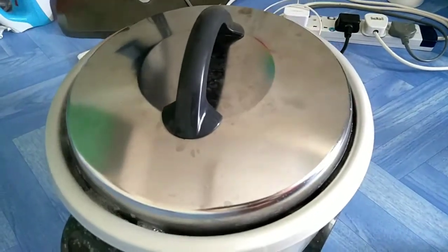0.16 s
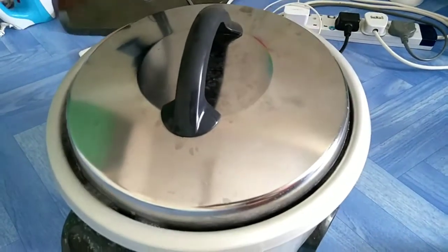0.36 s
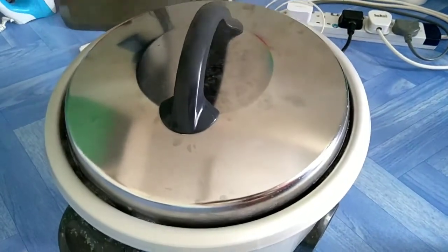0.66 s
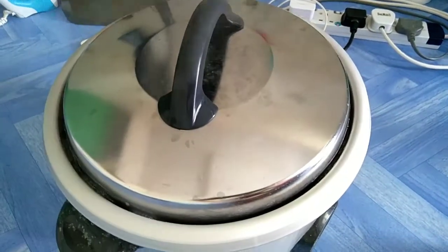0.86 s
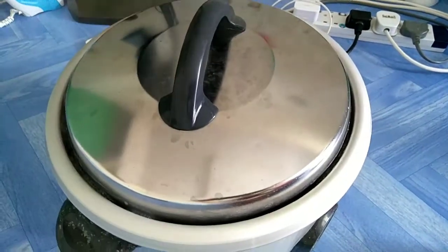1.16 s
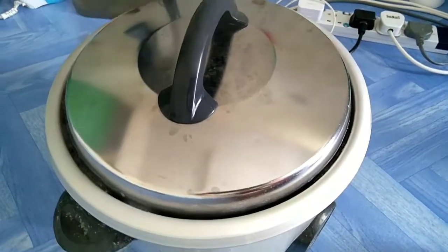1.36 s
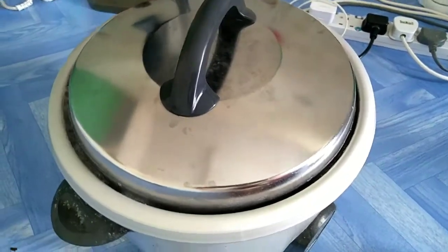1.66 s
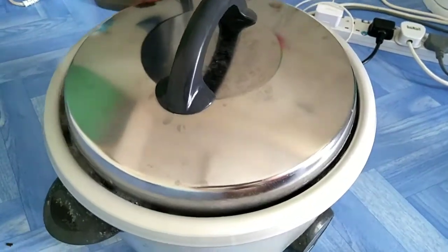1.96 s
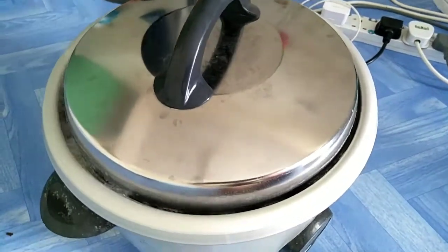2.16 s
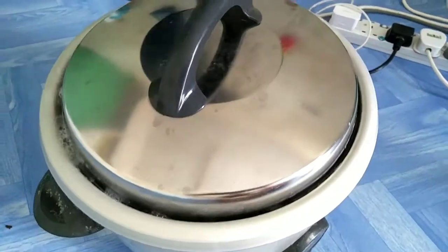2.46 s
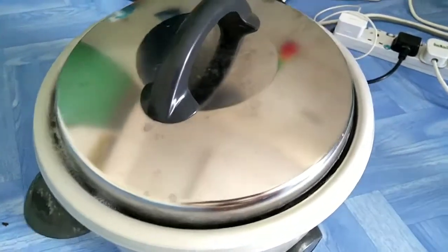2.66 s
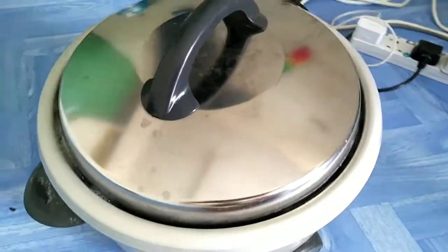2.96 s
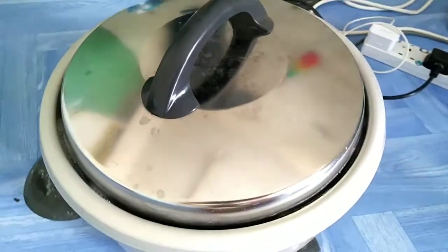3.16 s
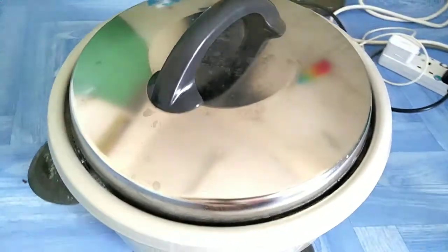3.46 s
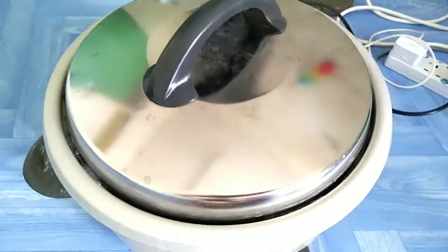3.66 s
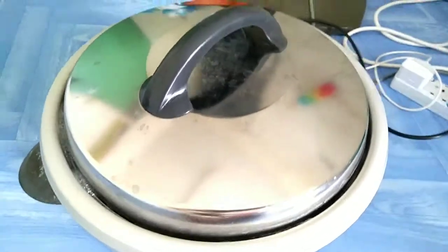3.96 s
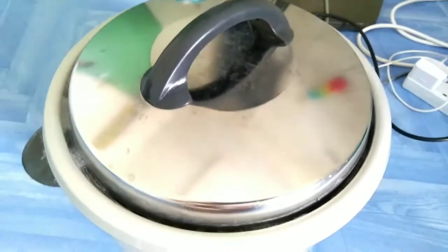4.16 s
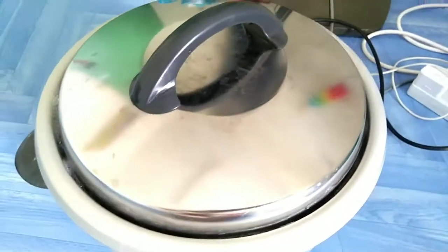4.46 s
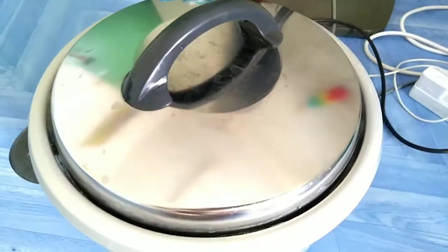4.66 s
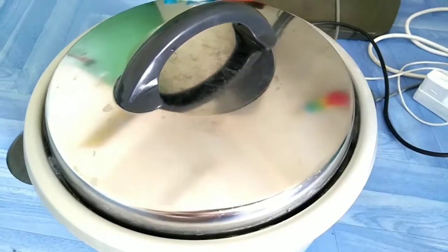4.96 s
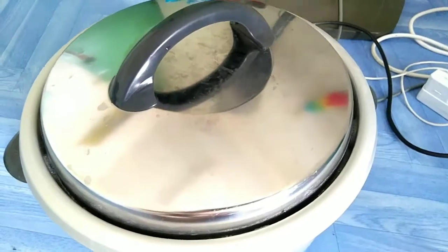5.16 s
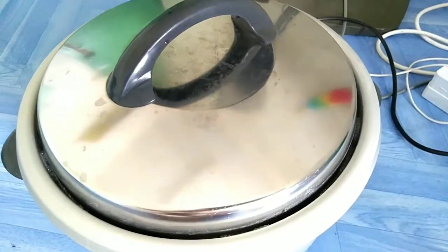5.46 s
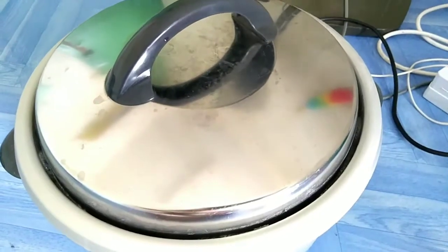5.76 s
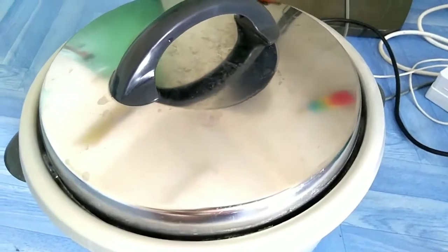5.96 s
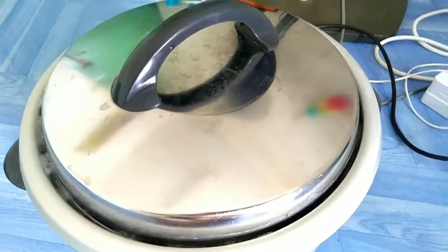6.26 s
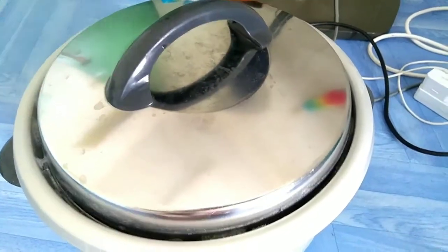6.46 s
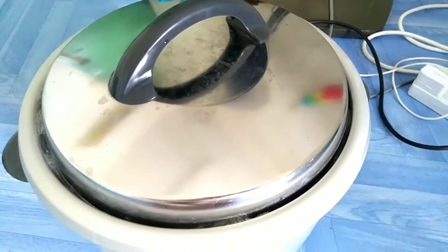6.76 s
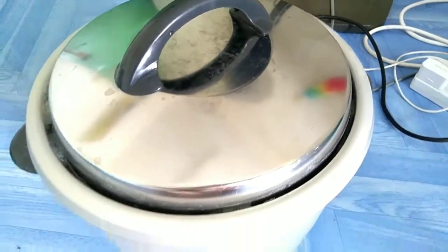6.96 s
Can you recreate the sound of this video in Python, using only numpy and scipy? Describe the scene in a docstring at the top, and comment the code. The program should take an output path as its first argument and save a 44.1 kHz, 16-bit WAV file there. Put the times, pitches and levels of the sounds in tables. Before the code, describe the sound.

Heard very close in a small kitchen, an electric rice cooker boils under a closed steel lid. Irregular hollow ticks and knocks ride over gurgling, deep rumble and a low hum. The lid clanks at once, then harder soon after two seconds, near four and six seconds, each time with a short wet hiss of steam. Knocking grows denser towards the end.

```python
"""A rice cooker boils under its closed steel lid, heard from just above it in a small kitchen.
At once the lid drops with a clank and a spit of steam; then bursting bubbles tick against it.
It drops again soon after 2 s, as the sound starts to shift from the pot's front to its side, then near 4.2 and 6.3 s.
All along, damped tones make bubbles and foam, shaped noise makes rumble, steam and air, and wavering sines hum."""
import sys
import numpy as np
from scipy import signal
from scipy.fft import rfft, irfft
from scipy.io import wavfile
from scipy.ndimage import uniform_filter1d

SR = 44100
rng = np.random.default_rng(int(sys.argv[2]) if len(sys.argv) > 2 else 0)


def transcribe(signal):
    """Save signal, clipped to [-1, 1], as a 16-bit WAV file at the path in sys.argv[1]."""
    frames = np.atleast_2d(signal).T
    limited = np.clip(frames, -1, 1)
    pcm = np.round(limited * 32767).astype(np.int16)
    wavfile.write(sys.argv[1], SR, pcm)


N = 313992
TAIL = 23000  # samples in an echo or a ringing tail

# bursting bubbles knock on the lid:
# (t/s, strength/dB, hardness 0-1 from a wet nudge to bare steel, dome pitch f/Hz, spit pitch f/Hz)
KNOCKS = [(0.035, -33.5, 0.8, 1750, 6300), (0.0669, -30, 0.35, 1790, 6400), (0.091, -55, 0.4, 1750, 6300),
          (0.261, -42.5, 0.3, 1780, 6200), (0.537, -27, 0.54, 1748, 7060), (0.5671, -27.5, 0, 1750, 7200),
          (0.762, -40, 0, 1704, 6000), (1.1055, -27, 0.2, 1738, 7150), (1.185, -32, 0.3, 1760, 6100),
          (1.55, -48, 0.3, 1726, 6000), (1.5923, -42, 0.6, 1725, 6050), (1.7399, -36.5, 0.2, 1760, 6400),
          (1.9194, -28, 0.68, 1751, 6360), (2.039, -25, 0.67, 1772, 7100), (2.199, -30.5, 0.3, 1696, 7200),
          (2.22, -26.5, 0.6, 1750, 7200), (2.271, -27, 0, 1733, 6600), (2.49, -28.5, 0.8, 1780, 5900),
          (2.6622, -29, 0.5, 1776, 6200), (2.709, -31, 0.2, 1776, 6100), (2.765, -33.5, 0, 1800, 6600),
          (2.801, -41, 0.1, 1810, 5900), (2.843, -43, 0, 1834, 6000), (2.9809, -26, 0.79, 1753, 6260),
          (3.072, -35.5, 0.4, 1770, 5570), (3.168, -34.5, 0.2, 1733, 5700), (3.33, -33, 0.24, 1740, 6240),
          (3.6072, -31.5, 0.73, 1712, 7240), (3.695, -31, 0.69, 1725, 6600),
          (3.741, -35.5, 0.54, 1760, 6100), (3.8183, -29, 0.82, 1755, 6700), (4.027, -34.5, 0, 1744, 7100),
          (4.057, -29.5, 0.66, 1730, 7200), (4.1094, -26, 0.83, 1734, 6950),
          (4.545, -39.5, 0.45, 1730, 5900), (4.606, -44, 0.84, 1730, 5900),
          (4.752, -26.5, 0.86, 1700, 5900), (4.8188, -26, 1, 1707, 6450), (4.854, -37, 0.94, 1730, 6400),
          (4.905, -41, 0.8, 1790, 6000), (5.0039, -28.5, 0.61, 1774, 7460),
          (5.0854, -29.5, 0.62, 1735, 5840), (5.1617, -34.5, 0, 1750, 6200),
          (5.292, -41.5, 0.2, 1750, 5800), (5.36, -34.5, 0, 1750, 5670), (5.6253, -29, 0.38, 1747, 6450),
          (5.7924, -24.5, 0.76, 1718, 7560), (6.025, -24, 0.5, 1717, 7500), (6.0908, -27, 0.3, 1720, 7300),
          (6.1463, -31, 0.75, 1776, 7100), (6.389, -19.5, 0.5, 1793, 6100), (6.408, -29, 0.3, 1810, 6200),
          (6.4355, -25.5, 0.8, 1776, 6100), (6.4791, -28.5, 0.1, 1870, 6000), (6.774, -27, 0.9, 1860, 6950),
          (6.8232, -25, 0.7, 1785, 7400), (6.8657, -27, 0.7, 1827, 6800), (6.959, -27, 0.7, 1834, 6700),
          (7.058, -30, 0.66, 1812, 7400)]
# the lifted lid drops back on its seat: (t/s, strength/dB, echo tail/dB, clank level/dB, clank t60/s,
# flange ring level/dB, flange pitch f/Hz, dome pitch f/Hz, extra long lid tones/dB)
DROPS = [(.0034, -23.5, 7, -49.5, 0.067, -68, 4700, 1755, -18),
         (2.3100, -12, 3, -53, 0.53, -50.5, 3500, 1796, 5),
         (2.461, -20.5, 9, -80, 0.46, -65, 4500, 1762, -1),
         (4.182, -9.5, 3.5, -44.5, 0.44, -51.5, 3000, 1803, 2),
         (6.3028, -17.5, 5.5, -54, 0.36, -73, 3200, 1777, -10),
         (6.3651, -6, -3, -36.5, 0.49, -51, 3400, 1767, -10),
         (6.3755, -11, 0.5, -40, 0.62, -55, 4600, 1790, -4)]
DROP_HARDNESS, DROP_SPIT_HZ = 0.61, 6240

# tone colours of a knock's ring, hollow body and spit, each: (f/Hz, relative level/dB)
RING_COLOUR = [(800, -36.5), (1080, -30.5), (1250, -8), (1380, -11), (1500, -7), (1630, -11), (1730, 1),
               (1840, -6.5), (1930, -19.5), (2060, -28.5), (2300, -60), (3000, -71)]
BODY_COLOUR = [(25, -28.5), (50, -14.5), (120, 1.5), (200, 5), (320, -6.5), (480, -1.5), (650, 0),
               (820, -0.5), (1100, -5.5), (1600, -38), (2000, -43), (2600, -45.5), (4500, -71)]
SPIT_COLOUR = [(3000, -43), (4300, -8), (5000, -7.5), (5600, -1.5), (6400, 2.5), (7400, 5.5), (8300, -0.5),
               (9200, -6), (11500, -8.5), (13500, -28), (14500, -47), (16000, -61)]
# long-ringing tones of the steel lid: (f/Hz, relative level/dB, t60/s)
LID_TONES = [(813, -4, 0.56), (1231, -22, 1.1), (1466, -9.5, 1.0), (1527, 4, 0.72), (1727, -5.5, 0.48),
             (1883, -14.5, 0.19), (1847, -4, 0.8), (2084, -31, 0.8), (2506, -21.5, 0.38), (2823, -28, 0.51),
             (3160, -27, 0.33)]
# short tones of the lid's dome, all shifted with the first by the water on its seat:
# (f/Hz, relative level/dB, t60/s)
DOME_TONES = [(1760, 0, .26), (1810, -7, .3), (1490, -13, .2), (1270, -14, .15), (800, -16, .12),
              (625, -14, .14)]
# high tones of the lid's rim: (f/Hz, relative level/dB, t60/s)
RIM_TONES = [(5610, 0, .36), (6120, -6, .3), (6680, -4, .3), (7080, -2, .3), (7500, 0, .33),
             (7890, -7, .26), (8380, -4, .24)]
# tones of the pot's flange, which only the falling lid reaches: (f/Hz, relative level/dB, t60/s)
FLANGE_TONES = [(2490, -3, .36), (2760, 0, .33), (3200, -8, .3), (3600, -9, .3), (4177, -10, .4),
                (4490, -2, .45), (4750, 0, .33), (5200, 0, .28), (5420, 6, .38), (6293, 5, .3)]
# colour of the clank: (f/Hz, relative level/dB)
CLANK_COLOUR = [(1600, -28), (2200, 21), (2500, 6), (2800, 8.5), (3250, 1.5), (3600, -19), (4100, -7),
                (4600, -13), (5400, -16), (7200, -33), (12000, -53)]
# colour of the instant of steel meeting steel: (f/Hz, relative level/dB)
CRACK_COLOUR = [(3500, -24), (4500, -8), (5000, -5), (5500, -4.5), (6200, 6.5), (7300, 3), (9000, -10),
                (12800, -19), (14000, -27), (16000, -42)]
# stereo width of a drop's spray and crack: (f/Hz, side minus middle level/dB)
WIDTH = [(2500, -45), (4500, -28), (6000, -17), (7500, -3), (9000, 0), (14000, -10)]

# parts of a knock against its strength: level when soft (dB), extra when fully hard (dB)
RING_DB, BODY_DB, BODY_HARD_DB, SPIT_DB, SPIT_HARD_DB = -10, -18, 8.5, -65, 36.5
DOME_DB, DOME_MOST_DB = -10, -25.5  # against strength; the seat stops the dome swinging wider than the second
DOME_TOP_HZ = 1980  # a steep filter keeps the dome's ring below this pitch
RIM_DB, RIM_MOST_DB = 3, -53  # rim tones against the spit; the wet seat damps them above the second
TONES_DB, TONES_SLOPE = -20, 1.45  # long lid tones: level, and dB per dB of strength
TAIL_DB, TAIL_SOFT_DB = 7, -4.5  # echo tail of a hard knock; dB added for a fully soft one
SPIT_FOCUS_DB, RIM_FOCUS_DB, FLANGE_FOCUS_DB = 19, 37, 10  # fall per octave away from a blow's own pitch
SPUTTER_DB, SPUTTER_RATE = 3, 110  # spray breaks up: spread of level, spurts per second
CRACK_DB, CRACK_T60_S = -27.5, .05  # level against the drop's strength, decay
CRACK_TAIL_DB, CRACK_TAIL_T60_S = -11, .33  # the crack's echo in the kitchen
# faint taps: per second, ring and hollow body against the boil (dB), spread of level (dB)
TAP_RATE, TAP_DB, TAP_BODY_DB, TAP_SPREAD_DB = 20, -14, -8, 6

# the lid trembles on its seat: (t/s, length/s, resonance f/Hz, peak level before flutter/dB)
CHATTER = [(.261, 0.12, 1500, -48.5), (.6, 0.13, 1533, -50), (1.11, 0.041, 1775, -43),
           (1.478, 0.15, 1740, -50.5), (1.739, 0.094, 1783, -52), (1.905, 0.056, 1750, -41.5),
           (3.26, 0.1, 1735, -45.5)]
CHATTER_RATE = 130  # contacts per second
CHATTER_RISE_S, CHATTER_T60_S = 0.015, .2

# colour of steam seeping through the wet rim: (f/Hz, relative level/dB)
STEAM_COLOUR = [(2500, -11), (3700, -16), (4500, -24), (5000, -9), (5600, -0.5), (6300, -1), (7200, -2.5),
                (8600, -13), (11500, -27.5), (13500, -35), (16000, -56)]
# puffs of steam: (peak t/s, half length/s, level/dB, share of free jet against wet sputter 0-1)
PUFFS = [(0.553, 0.02, -64.5, 0.84), (1.118, 0.024, -72, .95), (2.42, 0.094, -56, 0.2),
         (2.68, 0.079, -64.5, 0.97), (3.933, 0.065, -66.5, 0.2), (4.28, 0.08, -55.5, 0.06),
         (4.88, 0.1, -69, 0), (6.294, 0.066, -61, 0), (6.47, 0.1, -58, 0), (6.823, 0.045, -78, 0.2),
         (7.003, 0.023, -67, 0.1)]
# colour of a free jet: (f/Hz, relative level/dB)
PUFF_COLOUR = [(4500, -10), (5900, -2), (6700, 10.5), (8200, -3), (10000, 3), (11500, 0), (12600, -18),
               (15000, -28)]
# thin wavering tones, steam whistling at the rim and the flange ringing on after a drop:
# (peak t/s, half length/s, level before wavering/dB, mean pitch f/Hz)
THIN_TONES = [(2.5, .035, -67, 4520), (2.535, .025, -73, 3270), (2.58, .035, -75, 4170),
              (2.69, 0.072, -61.5, 6140), (3.023, 0.092, -73, 5650), (3.933, 0.029, -74, 5260),
              (4.01, 0.031, -74, 5750), (4.66, .05, -76, 5620), (6.276, 0.029, -65, 5470)]
SEEP_DB, SEEP_SLOPE = -86.5, 0.45  # seeping steam in a middling boil; dB per dB of boil
SQUEEZE_DB = -42.5  # steam pressed out by the falling lid, against the drop's strength
SQUEEZE_RISE_S, SQUEEZE_HOLD_S, SQUEEZE_T60_S = 0.0089, 0.068, 0.2
SIZZLE_ECHO_DB, SIZZLE_PATCHY_DB = 6, 8  # droplets ring the gap: early echo level, how far a few pitches stand out
THIN_DRIFT, THIN_JITTER = .006, .012  # slow and quick spread of a thin tone's pitch, as shares of it

# how hard it boils, before the gains below: (t/s, middling bubbles level/dB, small bubbles level/dB)
BOIL = [(0.0, -41, -76.5), (0.28, -57.5, -80), (0.95, -59, -76.5), (1.59, -58.5, -75), (1.94, -49.5, -52),
        (2.05, -38.5, -46), (2.16, -44, -61), (2.42, -47, -49), (2.74, -44.5, -59), (3.39, -62, -64.5),
        (3.61, -63, -66), (3.79, -47.5, -53.5), (4.2, -47, -48.5), (4.54, -50.5, -52), (4.8, -54.5, -68),
        (4.96, -46, -46), (5.19, -78, -58.5), (5.49, -70.5, -53.5), (5.65, -55.5, -52.5),
        (6.05, -50, -54.5), (6.25, -45, -46), (6.41, -43.5, -52), (6.64, -56, -56.5), (7.12, -48.5, -45.5)]
# colours of the deep rumble, the bubbling and the foam, each: (f/Hz, relative level/dB)
RUMBLE_COLOUR = [(20, -13.5), (33, -15), (56, -10.5), (72, -7), (98, -3.5), (120, -5), (145, -9.5),
                 (178, -6), (230, -7.5), (310, -13), (450, -21.5), (700, -34.5), (1500, -57.5)]
BUBBLING_COLOUR = [(250, -7.5), (420, 1.5), (640, 5.5), (760, -2), (900, -3.5), (1080, -12), (1280, -1),
                   (1580, -5.5), (1750, -0.5), (1900, -8.5), (2100, -24.5), (2800, -52)]
FOAM_COLOUR = [(1500, -35), (2000, 6.5), (2250, 2), (2500, -4), (2900, -9), (3600, -33)]
# foam surges up to the rim: (peak t/s, half length/s, level/dB)
SURGES = [(1.83, 0.061, -68), (3.3, 0.09, -62.5), (4.72, 0.57, -63.5), (5.27, 0.26, -62.5), (6, 0.21, -56),
          (6.55, 0.37, -58.5)]
# single damped tones, bubbles ringing out and high pings of the struck rim:
# (t/s, pitch f/Hz, level before swell and flutter/dB, t60/s)
PLINKS = [(.003, 4700, -58.5, 0.18), (.14, 645, -56, 0.38), (.262, 960, -56, 0.14), (.328, 621, -46, 0.42),
          (.33, 740, -47, 0.18), (.342, 1055, -57, 0.14), (.382, 1010, -63, .13), (.412, 644, -51, 0.44),
          (.478, 1590, -61, 0.31), (.54, 5330, -70, 0.18), (.6, 653, -60, 0.33), (.68, 783, -57, 0.4),
          (.682, 480, -50, 0.093), (.762, 1228, -47.5, 0.14), (.888, 1460, -54, 0.19),
          (.888, 598, -45.5, 0.2), (.975, 1490, -55, 0.15), (.995, 404, -48, 0.28), (1.01, 1950, -60, .2),
          (1.365, 1730, -55, 0.14), (1.55, 1354, -54, 0.15), (1.595, 615, -51.5, .3),
          (1.66, 1310, -54, 0.12), (1.71, 785, -53, 0.33), (1.985, 635, -37.5, 0.33),
          (2.19, 77.2, -19, 0.28), (2.32, 432, -27, 0.079), (2.85, 1040, -51, 0.18),
          (3.405, 1744, -44, 0.13), (3.48, 960, -56, 0.37), (3.555, 1740, -56, 0.3)]
GURGLE_DB, SMALL_DB = -4, 1.5  # gain of middling and small bubbles
LUMP_DB, LUMP_RATE = 2.2, 14  # bubbles come in clusters: spread of level, clusters per second
RUMBLE_FRONT_DB, RUMBLE_SIDE_DB = -42, -43  # the steady rumble, heard from the front and from the side

# the hum: (mean f/Hz, mean level from the front/dB, mean level from the side/dB)
HUM = [(57, -53.5, -55), (96.5, -50, -48.5), (117.7, -47, -62.5), (177, -48.5, -56.5)]
# the phone moves round the pot: (t/s, share of the way from front to side 0-1)
PATH = [(0, 0), (2.4, 0), (3.3, 1), (7.12, 1)]
# colour of the steady background hiss: (f/Hz, relative level/dB)
AIR_COLOUR = [(500, 1), (1500, 8.5), (2200, 9.5), (2800, 5), (3700, -2), (4600, -2.5), (5800, 0.5),
              (7500, -7), (10000, -5), (15500, -6.5)]
TOP_HZ = 15650  # the phone's upper limit


def lid_knocks():
    """Bubbles knock on the lid in the middle; its drops add a wide high hiss: middle, side."""
    mid, side = np.zeros((2, N))
    for s, db, hardness, dome_hz, spit_hz in KNOCKS:
        tail_db = TAIL_DB + TAIL_SOFT_DB * (1 - hardness)
        add(mid, s, knock(db, hardness, tail_db, dome_hz, spit_hz))
    for s, db, tail_db, *_, dome_hz, tones_db in DROPS:
        add(mid, s, knock(db, DROP_HARDNESS, tail_db, dome_hz, DROP_SPIT_HZ, tones_db))
        add(side, s, spray(db, DROP_HARDNESS, DROP_SPIT_HZ))
    return mid, side


def knock(db, hardness, tail_db, dome_hz, spit_hz, tones_db=0):
    """One blow rings the lid; the harder it is, the more hollow body and bright spit."""
    ring = echoes(-2.1, 0.07, 1.5 + tail_db, 0.46, width_hz=55, patchy_db=4)
    body = echoes(1.1, 0.029, 0.5 + tail_db, 0.45, width_hz=51.7, patchy_db=3.0)
    dome_modes = np.array(DOME_TONES) * [dome_hz / DOME_TONES[0][0], 1, 1]
    dome = steel(dome_modes, scatter_db=1.5, detune=.004, rise_s=.003, flutter_rate=90)
    rim_modes = focus(RIM_TONES, spit_hz, RIM_FOCUS_DB)
    rim = steel(rim_modes, scatter_db=2.5, detune=.008, rise_s=.012, flutter_rate=90)
    long_tones = steel(LID_TONES, scatter_db=1.5, detune=0.00071, rise_s=0.1)
    spit_db = db + SPIT_DB + SPIT_HARD_DB * hardness
    return (undb(db + RING_DB) * strike(colour(ring, RING_COLOUR))
            + undb(min(db + DOME_DB, DOME_MOST_DB)) * below_top(dome)
            + undb(db + BODY_DB + BODY_HARD_DB * hardness) * strike(colour(body, BODY_COLOUR))
            + undb(TONES_DB + TONES_SLOPE * db + tail_db + tones_db) * long_tones
            + undb(min(RIM_DB + spit_db, RIM_MOST_DB)) * rim
            + spray(db, hardness, spit_hz))


def spray(db, hardness, spit_hz):
    """Water squeezed from the seat builds over a few milliseconds and sputters round one pitch."""
    t = np.arange(TAIL) / SR
    spurts = np.interp(t * SPUTTER_RATE, np.arange(100), rng.standard_normal(100))
    hiss = echoes(8, 0.04, 16, 0.24, width_hz=170, patchy_db=8)
    hiss = hiss * (1 - fade(t, 0.012)) * undb(SPUTTER_DB * spurts)
    hiss = strike(colour(hiss, focus(SPIT_COLOUR, spit_hz, SPIT_FOCUS_DB)))
    return undb(db + SPIT_DB + SPIT_HARD_DB * hardness) * hiss


def below_top(x):
    """A steep filter keeps the dome's ring below its top pitch."""
    return signal.sosfilt(signal.cheby1(10, .5, DOME_TOP_HZ, fs=SR, output="sos"), x)


def lid_drops():
    """Steel on steel: the falling lid cracks down, clanks and rings the pot's flange: middle, side."""
    mid, side = np.zeros((2, N))
    t = np.arange(TAIL) / SR
    burst = fade(t, CRACK_T60_S) + undb(CRACK_TAIL_DB) * fade(t, CRACK_TAIL_T60_S)
    for s, db, _, clank_db, t60, flange_db, flange_hz, *_ in DROPS:
        clank = echoes(3, .1, 26, t60, width_hz=60, patchy_db=11)
        add(mid, s, undb(clank_db) * strike(colour(clank, CLANK_COLOUR)))
        modes = focus(FLANGE_TONES, flange_hz, FLANGE_FOCUS_DB)
        flange = steel(modes, scatter_db=2, detune=.003, rise_s=.04, flutter_rate=55)
        add(mid, s, undb(flange_db) * flange)
        for out in mid, side:  # separate noise for each, so the crack sounds wide
            crack = colour(patchy(width_hz=160, patchy_db=2.5) * burst, CRACK_COLOUR)
            add(out, s, undb(db + CRACK_DB) * strike(crack))
    return mid, side


def taps():
    """Countless lesser bubbles jog the lid, harder as the boil rises: random clicks with echoes."""
    when, size = rng.random((2, N))
    clicks = (when < TAP_RATE / SR) * undb(-TAP_SPREAD_DB * np.log(np.maximum(size, .1)))
    room = echoes(-1.3, 0.024, 0, 0.51, width_hz=23, patchy_db=-5.5)
    ring = signal.fftconvolve(clicks, room)[:N]
    return (unit(colour(ring, RING_COLOUR)) * undb(curve(BOIL, order=2) + TAP_DB)
            + unit(colour(ring, BODY_COLOUR)) * undb(curve(BOIL, order=1) + TAP_BODY_DB))


def lid_chatter():
    """Floating on steam, the lid trembles on its seat and keeps one resonance ringing unevenly."""
    out = np.zeros(N)
    t = np.arange(TAIL) / SR
    for (s, length, hz, db), scatter in zip(CHATTER, flutter(CHATTER_RATE, count=len(CHATTER))):
        shape = (1 - fade(t, CHATTER_RISE_S)) * fade(np.maximum(t - length, 0), CHATTER_T60_S)
        add(out, s, undb(db) * shape * np.imag(scatter * np.exp(2j * np.pi * hz * t)))
    return out


def steam():
    """Steam seeps through the wet rim as hard as it boils, is pressed out by drops and sometimes puffs."""
    jet = unit(rng.standard_normal(N) * undb(1.8 * walk(200)))
    droplets = unit(bubbles(600, 4300, 12500, 900, 2.0, .006))
    gap = echoes(SIZZLE_ECHO_DB, 0.02, 0, 0.15, width_hz=77, patchy_db=SIZZLE_PATCHY_DB)
    sizzle = unit(signal.fftconvolve(droplets + jet, gap)[:N])
    wet = unit(colour(sizzle, STEAM_COLOUR))
    free = unit(colour(sizzle + jet, PUFF_COLOUR))
    boil_db = curve(BOIL, order=2)
    flow = undb(SEEP_DB + SEEP_SLOPE * (boil_db - boil_db.mean()))
    t = np.arange(TAIL) / SR
    squeeze = np.minimum(t / SQUEEZE_RISE_S, 1) * fade(np.maximum(t - SQUEEZE_HOLD_S, 0), SQUEEZE_T60_S)
    for s, db, *_ in DROPS:
        add(flow, s, undb(db + SQUEEZE_DB) * squeeze)
    out = flow * wet
    for puff in PUFFS:
        share = puff[3]
        out += swells([puff]) * (share * free + (1 - share) * wet)
    return out


def thin_tones():
    """Steam whistles at the rim, and the flange rings on after a drop: thin sines wavering in pitch and level."""
    out = np.zeros(N)
    for row in THIN_TONES:
        hz = row[3] * (1 + THIN_DRIFT * walk(21) + THIN_JITTER * walk(320))
        phase = 2 * np.pi * np.cumsum(hz) / SR
        out += swells([row]) * undb(3 * walk(98)) * np.sin(phase)
    return out


def rumble():
    """Big slow bubbles, as low damped tones and noise, rumble in the pot."""
    deep = unit(bubbles(400, 35.8, 534.0, 14.3, 1.5, 0.17)) + rng.standard_normal(N)
    deep = colour(deep, RUMBLE_COLOUR)
    # the heater's power is constant, so the rumble evens out over a fraction of a second
    deep /= np.sqrt(uniform_filter1d(deep ** 2, size=5000))
    return deep * undb(RUMBLE_FRONT_DB + curve(PATH) * (RUMBLE_SIDE_DB - RUMBLE_FRONT_DB))


def bubbling():
    """Middling and small bubbles gurgle and ring under the lid in clusters, following the boil."""
    gurgle = unit(colour(simmer(bubbles(220, 350, 900, 55, 1.8, .04)), BUBBLING_COLOUR))
    small = unit(colour(simmer(bubbles(170, 830, 1950, 120, 2.4, .008)), BUBBLING_COLOUR))
    return (gurgle * undb(curve(BOIL, order=1) + GURGLE_DB + LUMP_DB * walk(LUMP_RATE))
            + small * undb(curve(BOIL, order=2) + SMALL_DB + LUMP_DB * walk(LUMP_RATE)))


def foam():
    """Many tiny high bubbles fizz as the foam surges up to the rim."""
    fizz = simmer(bubbles(150, 1900, 2500, 190, 2, .04))
    return unit(colour(fizz, FOAM_COLOUR)) * swells(SURGES)


def plinks():
    """Bubbles ring out and the struck rim pings: damped tones, scattered in level and phase."""
    out = np.zeros(N)
    t = np.arange(TAIL) / SR
    for (s, hz, db, t60), scatter in zip(PLINKS, flutter(70, count=len(PLINKS))):
        tone = np.imag(scatter * np.exp(2j * np.pi * hz * t))
        swell = (1 - np.exp(-t * hz / 2)) ** 2
        add(out, s, np.sqrt(2) * undb(db) * tone * swell * fade(t, t60))
    return out


def hum():
    """The cooker's low hum wavers in level and pitch and changes as the phone moves."""
    out, moved = np.zeros(N), curve(PATH)
    for hz, front_db, side_db in HUM:
        db = front_db + moved * (side_db - front_db) + 2 * walk(11)
        phase = 2 * np.pi * np.cumsum(hz + 4 * walk(16)) / SR
        out += np.sqrt(2) * undb(db) * np.sin(phase)
    return out


def air():
    """A faint steady hiss: coloured noise."""
    return undb(-72.5) * unit(colour(rng.standard_normal(N), AIR_COLOUR))


def bubbles(rate, low_hz, high_hz, cycles, spread_db, glide):
    """Bubbles (rate per second) of random time, pitch, size and life."""
    out = np.zeros(N)
    for when, pitch, size, life in rng.random((int(rate * N / SR), 4)):
        hz = low_hz + (high_hz - low_hz) * pitch
        gain = undb(-spread_db * np.log(max(size, .06)))
        add(out, when * N / SR, gain * bubble(hz, cycles * (.5 + life) / hz, glide))
    return out


def bubble(hz, t60, glide):
    """A damped tone that swells over a few cycles and rises a little as it dies."""
    t = np.arange(int(t60 * SR)) / SR
    tone = np.sin(2 * np.pi * hz * t * (1 + glide * t / t60 / 2))
    return tone * fade(t, t60) * (1 - np.exp(-t * hz / 2)) ** 2


def simmer(x):
    """Bubble tones smeared by their echoes under the lid and in the kitchen."""
    return signal.fftconvolve(x, echoes(-1.5, 0.032, -3, 0.3, width_hz=80, patchy_db=-4))[:N]


def steel(modes, scatter_db, detune, rise_s, flutter_rate=0):
    """Ringing tones; contact and water move round the rim, so each blow weighs and tunes them anew."""
    t = np.arange(TAIL) / SR
    hz, db, t60 = np.transpose(modes)
    weight, shift = rng.standard_normal((len(hz), 2)).T
    phase = np.float32(2 * np.pi * (hz * (1 + detune * shift))[:, None] * t)
    # with a flutter rate, the tones waver too
    gain = flutter(flutter_rate, count=len(hz)) if flutter_rate else 1 + 0j
    tones = gain.real * np.sin(phase) + gain.imag * np.cos(phase)
    ending = np.minimum(np.linspace(10, 0, TAIL), 1)
    ringing = undb(db + scatter_db * weight) @ (tones * fade(t, t60[:, None]))
    return ringing * (1 - fade(t, rise_s)) ** 2 * ending


def flutter(rate, count):
    """Complex gains, starting at 1, that scatter a ringing tone's level and phase; one row each."""
    t = np.arange(TAIL) / SR
    points = .6 + .7 * rng.standard_normal((count, 200, 2)) @ np.array([1, 1j])
    points[:, 0] = 1
    return np.array([np.interp(t * rate, np.arange(len(row)), row) for row in points])


def echoes(early_db, early_t60, late_db, late_t60, width_hz, patchy_db):
    """A direct pulse, quick reflections from pot and lid, then a tail with uneven pitches."""
    t = np.arange(TAIL) / SR
    early = unit(rng.standard_normal(TAIL) * fade(t, early_t60))
    late = unit(patchy(width_hz, patchy_db) * fade(t, late_t60))
    h = (undb(early_db) * early + undb(late_db) * late) / np.sqrt(TAIL)
    h[0] += 1
    return h


def patchy(width_hz, patchy_db):
    """A stretch of noise with random resonances about width_hz apart."""
    hz = np.arange(TAIL // 2 + 1) * SR / TAIL
    ripple = np.interp(hz / width_hz, np.arange(1000), rng.standard_normal(1000))
    gain = undb(patchy_db * np.clip(ripple, -2, 1.5))
    return irfft(rfft(rng.standard_normal(TAIL)) * gain)


def focus(rows, centre_hz, slope_db):
    """Weaken the (Hz, dB, ..) rows by slope_db for each octave that they lie from centre_hz."""
    out = np.array(rows, dtype=float)
    out[:, 1] -= slope_db * np.abs(np.log2(out[:, 0] / centre_hz))
    return out


def colour(x, points):
    """Filter x to the given (Hz, dB) response without sounding ahead of time (minimum phase)."""
    size = 8192
    hz, db = np.transpose(points)
    freq = np.maximum(np.arange(size // 2 + 1) * SR / size, 1)
    cepstrum = irfft(np.log(undb(np.interp(np.log(freq), np.log(hz), db))))
    # fold the cepstrum forward in time
    cepstrum[1:size // 2] *= 2
    cepstrum[size // 2 + 1:] = 0
    response = irfft(np.exp(rfft(cepstrum)))[:size // 2]
    return signal.fftconvolve(x, response)[:len(x)]


def swells(table):
    """Level in time of smooth swells, each row starting (s at the peak, half length s, dB)."""
    t = np.arange(N) / SR
    return sum(undb(row[2]) * np.exp(-((t - row[0]) / row[1]) ** 2) for row in table)


def curve(table, order=1):
    """One column of a table, joined by straight lines in time."""
    rows = np.array(table)
    return np.interp(np.arange(N) / SR, rows[:, 0], rows[:, order])


def walk(rate):
    """Slow chance: random steps (rate per second) smoothed twice, spread near 1."""
    k = int(SR / rate)
    steps = np.repeat(rng.standard_normal(N // k + 1), k)
    return unit(uniform_filter1d(uniform_filter1d(steps, k), k)[:N])


def fade(t, t60):
    """Exponential decay, 60 dB in t60 seconds."""
    return np.exp(-np.log(1000) * t / t60)


def strike(x):
    """Scale a hit so that its loudest 6 ms have rms 1."""
    return x / np.sqrt(uniform_filter1d(x ** 2, size=264).max())


def unit(x):
    """Scale to rms 1."""
    return x / np.sqrt(np.mean(x ** 2))


def undb(db):
    """Decibels to gain."""
    return 10 ** (np.asarray(db) / 20)


def add(out, s, x):
    """Mix x into out from time s on."""
    i = int(np.clip(s * SR, 0, N - 1))
    out[i:i + len(x)] += x[:N - i]


def scene():
    """Everything sits in the middle; only the high hiss of the drops has width."""
    knocks, spit_side = lid_knocks()
    drops, crack_side = lid_drops()
    lid = knocks + drops + taps() + lid_chatter()
    boil = rumble() + bubbling() + foam() + plinks()
    mid = lid + steam() + thin_tones() + boil + hum() + air()
    side = colour(spit_side + crack_side, WIDTH)
    return np.array([mid + side, mid - side])


def record(dry):
    """The phone cuts the top with a steep filter."""
    return signal.sosfilt(signal.ellip(10, .1, 80, TOP_HZ, fs=SR, output="sos"), dry)


dry = scene()
out = record(dry)
transcribe(out)
```